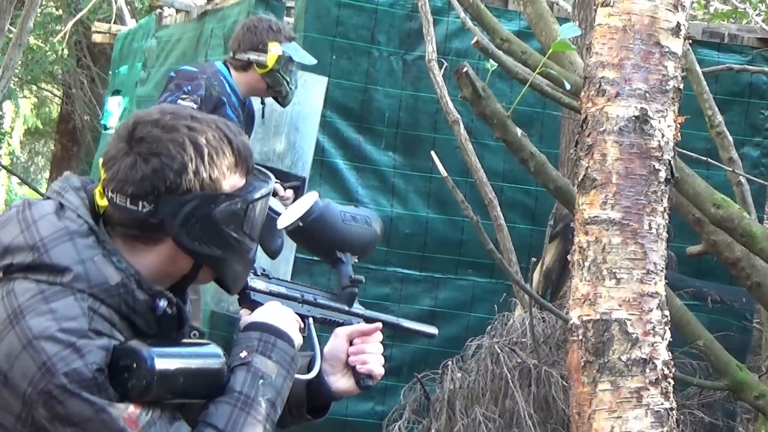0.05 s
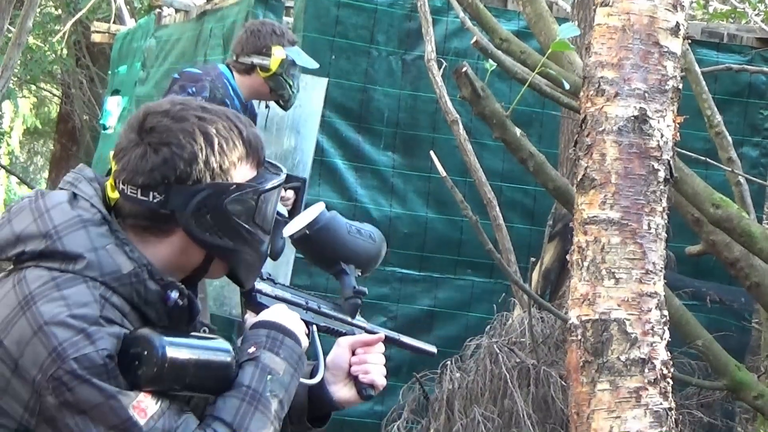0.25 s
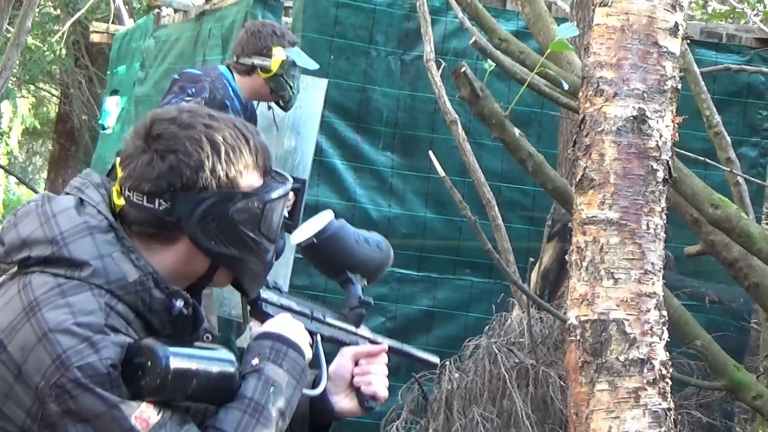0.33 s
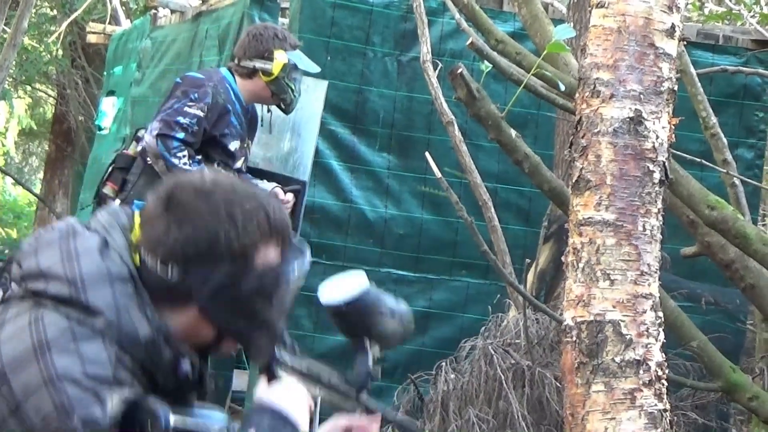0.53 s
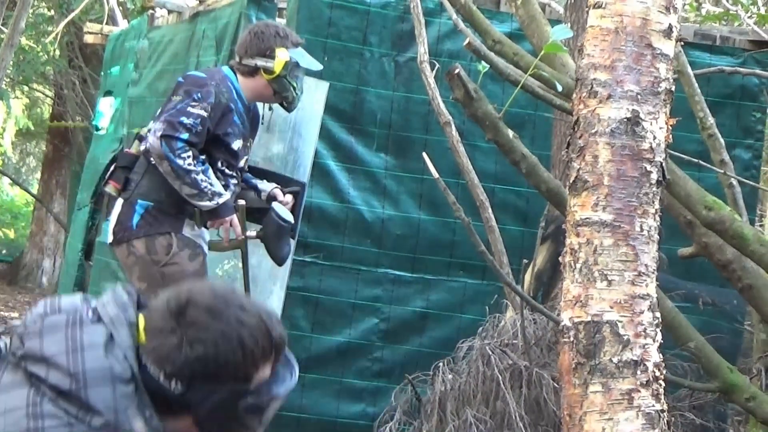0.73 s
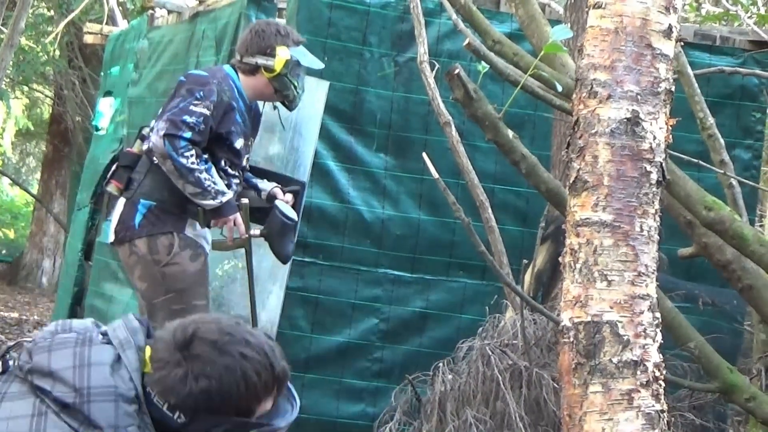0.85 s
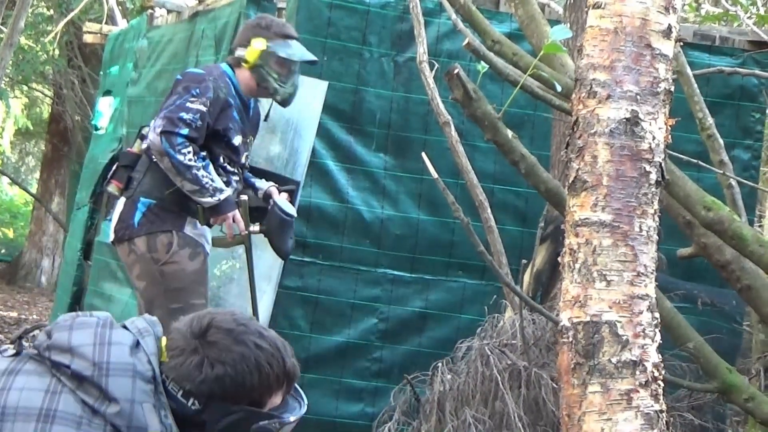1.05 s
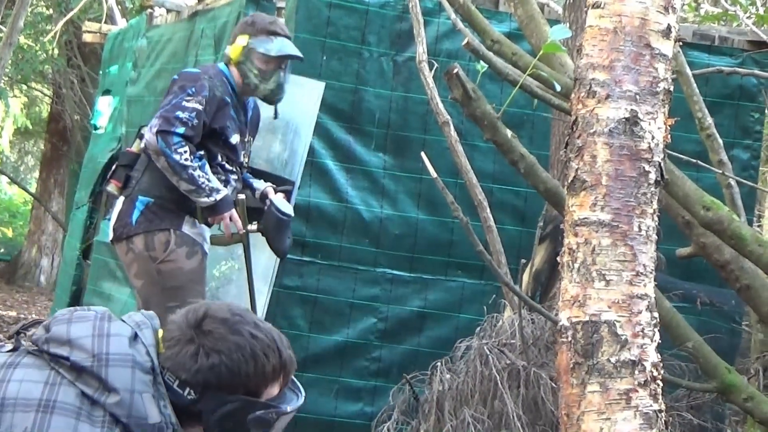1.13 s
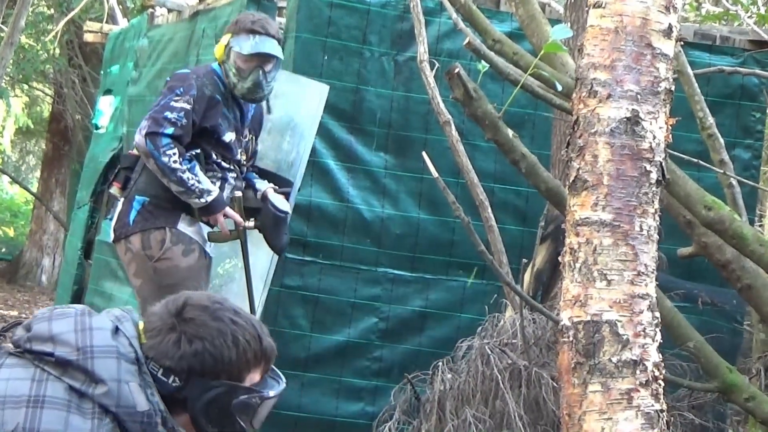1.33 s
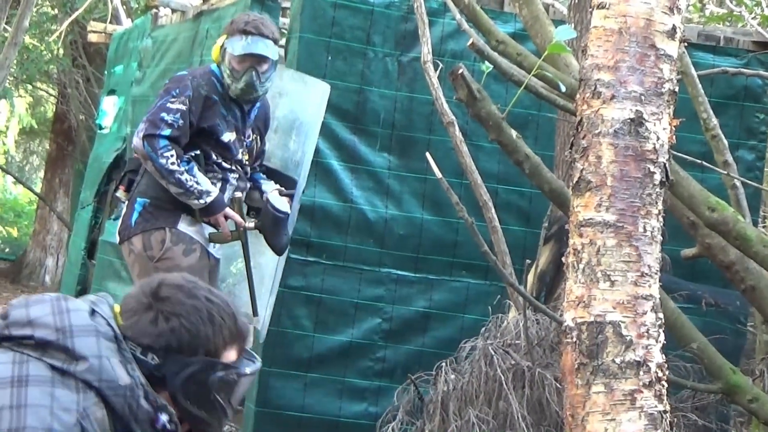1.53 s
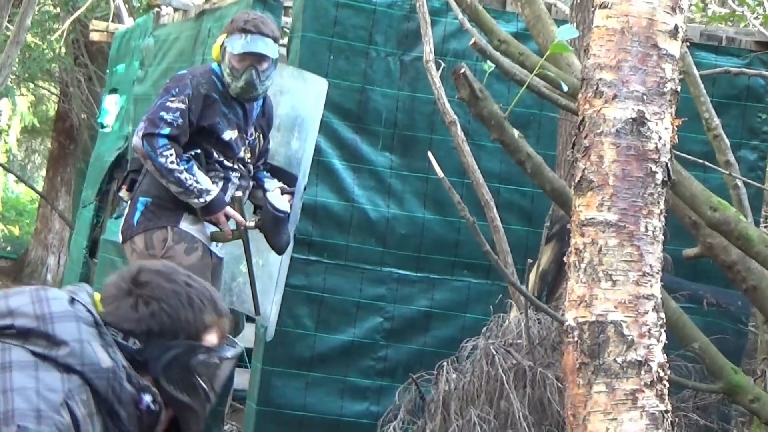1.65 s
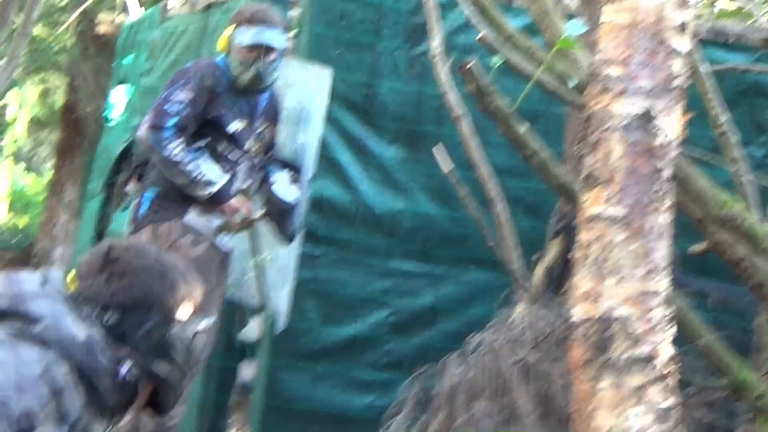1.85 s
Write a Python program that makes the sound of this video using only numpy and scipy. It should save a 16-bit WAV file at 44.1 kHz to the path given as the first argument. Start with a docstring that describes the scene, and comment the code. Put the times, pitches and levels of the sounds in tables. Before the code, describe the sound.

Paintball gunfire: five quick gas pops answered by sharp cracking ball impacts in a quiet wood

```python
"""A soft, distant wash opens a paintball scene in a wood, leaning left: steady coloured noise.
A marker then fires five times: gas pulses pop and ring its barrel modes, spent gas hisses as slow noise.
Clothes rustle as grainy noise; hard bits tick and sizzle close by; far-off pops are dull noise bursts.
Incoming balls crack on the cover, ring its modes, spray the brush and leave a boom.
Knocks are single modes, clicks are short noise, and a diffuse noise tail scatters the fire off trunks."""
import sys
import numpy as np
from scipy import signal
from scipy.fft import rfft, irfft, next_fast_len
from scipy.io import wavfile

SR = 44100
rng = np.random.default_rng(int(sys.argv[2]) if len(sys.argv) > 2 else 0)


def wrap_up_sound(samples):
    """Save the sound to the file named by the first command line argument, as 16-bit audio."""
    columns = np.atleast_2d(samples).T
    # keep every value between -1 and 1, then stretch to whole-number steps
    tamed = np.clip(columns, -1, 1)
    steps = np.round(tamed * 32767).astype(np.int16)
    wavfile.write(sys.argv[1], SR, steps)


N = 83790
TIME = np.arange(N) / SR


def from_db(db):
    """Decibels to gain."""
    return 10 ** (np.asarray(db) / 20)


def rms_one(x):
    """Scale to rms 1."""
    return x / np.sqrt(np.mean(x ** 2) + 1e-20)


def pan(db):
    """Left and right gains for a left-minus-right level difference."""
    return from_db(np.array([[db], [-db]]) / 2)


def level(rows):
    """Gain over time, drawn through (seconds, dB) points."""
    return from_db(np.interp(TIME, *np.transpose(rows)))


def at_hz(points, hz):
    """Read a table on a log-frequency axis."""
    table_hz, value = np.transpose(points)
    return np.interp(np.log(hz + 1), np.log(table_hz), value)


def colour(x, spectrum):
    """Minimum-phase filter with the given spectrum shape; white noise keeps its power."""
    size = 2 * next_fast_len(N)
    hz = np.arange(size // 2 + 1) * SR / size
    gain = rms_one(from_db(at_hz(spectrum, hz)))
    # Folding the cepstrum onto positive time makes the filter causal
    cepstrum = irfft(np.log(gain))
    cepstrum[1:size // 2] *= 2
    cepstrum[size // 2 + 1:] = 0
    response = np.exp(rfft(cepstrum))
    return irfft(rfft(x, size) * response)[..., :N]


def snap(envelope, spectrum):
    """A short rush of turbulence: random signs under an envelope, coloured as it leaves the source."""
    return colour(envelope * rng.choice([-1, 1], N), spectrum)


# How alike left and right are in diffuse noise. Each row: frequency in Hz, likeness from 0 to 1.
STEREO_LIKENESS = [(60, 1), (400, 0.99), (1000, 0.91), (2500, 0.53), (5000, 0.76), (9000, 0.9), (14000, 1)]


def noise(spectrum, envelope=1):
    """Diffuse stereo noise under an envelope, then coloured."""
    alike = np.clip(at_hz(STEREO_LIKENESS, np.arange(N // 2 + 1) * SR / N), 0, 1)
    mid, side = rfft(rng.standard_normal((2, N)))
    both = np.sqrt(1 + alike) * mid + np.sqrt(1 - alike) * side * [[1], [-1]]
    return colour(envelope * rms_one(irfft(both, N)), spectrum)


def burst(s, t60, rise=0):
    """Envelope that starts at s seconds, rises linearly and dies away by 60 dB per t60."""
    age = np.maximum(TIME - s, 0)
    attack = np.minimum(age / max(rise, 1 / SR), 1)
    return attack * from_db(-60 * np.clip((age - rise) / t60, 0, 2))


def ring(s, hz, t60, rise=0):
    """One resonant mode, kicked at s seconds."""
    return burst(s, t60, rise) * np.cos(2 * np.pi * hz * (TIME - s))


def grain(spread_db, size=30):
    """Gain that jumps from one tiny contact to the next, every size samples."""
    sizes = from_db(spread_db * np.minimum(rng.exponential(1, N // size + 1), 6))
    return rms_one(np.repeat(sizes, size)[:N])


# Tone of the distant wash. Each row: frequency in Hz, relative spectrum in dB.
WASH_TONE = [(25, -33), (50, -33), (75, -14.5), (120, -18.5), (250, -18), (400, -10), (650, -4), (980, 2),
             (1500, -5.5), (2500, -14), (5000, -30.5), (9000, -25), (16000, -33.5)]
# Slow swell of the wash. Each row: time in seconds, level in dB before panning.
WASH_SWELL = [(0, -54), (.2, -55), (.9, -49.5), (1.4, -50), (1.9, -51)]
WASH_PAN_DB = 2.1  # left minus right


def wash():
    """Soft, distant wash of the wood: diffuse noise swelling slowly, louder on the left."""
    return pan(WASH_PAN_DB) * noise(WASH_TONE, level(WASH_SWELL))


# Tone of the clothing. Each row: frequency in Hz, relative spectrum in dB.
RUSTLE_TONE = [(80, -29), (500, -10), (2000, 0), (4000, 3), (6500, -0.5), (9000, 1), (12000, -7),
               (16000, -30)]
# Movement of the clothes. Each row: time in seconds, level in dB.
RUSTLE_MOVES = [(0, -66), (.212, -68), (.222, -46.5), (.7, -48.5), (1.0, -50.5), (1.2, -55), (1.4, -62.5),
                (1.55, -59), (1.62, -63), (1.7, -60), (1.78, -66), (1.9, -62)]
RUSTLE_GRAIN_DB = 2


def rustle():
    """Clothes rustle as many tiny rubbing contacts of uneven strength."""
    return noise(RUSTLE_TONE, level(RUSTLE_MOVES) * grain(RUSTLE_GRAIN_DB))


# The marker's shots. Each row: start in seconds, pop trim in dB, gas hiss level in dB.
MARKER_SHOTS = [(0.2382, 0.5, -36.5), (0.3935, 1, -37.5), (0.5397, 0.5, -35.5), (0.7364, 2, -31.5),
                (0.8386, 2, -33.5)]
# Modes of the barrel and body. Each row: frequency in Hz, level in dB relative to the kick, t60 in seconds.
BARREL_MODES = [(231, -46, 0.045), (365.8, -41.5, 0.13), (582, -42.5, 0.082), (678, -46.5, 0.048),
                (944, -35.5, 0.084), (1136, -34.5, 0.054), (1350, -54, 0.066), (1577, -34, 0.051),
                (1652, -34.5, 0.058), (1995, -33.5, 0.058), (2120, -36, 0.041), (2465, -36, .035),
                (2947, -37.5, 0.043), (4260, -45, 0.057)]
# Tone of the muzzle pop. Each row: frequency in Hz, relative spectrum in dB.
POP_TONE = [(100, -17.5), (500, -3.5), (1800, 8), (3200, 1.5), (5500, -8.5), (9000, -4.5), (16000, -26)]
POP_DB, POP_T60_S = -28.5, 0.044  # each shot trims this level
BOLT_LEAD_S, BOLT_DB = 0.00241, -22  # bolt knock ahead of the pulse, relative to it
PULSE_LOW_HZ, PULSE_TOP_HZ = 119, 4700
PUSH_HZ, PUSH_DB, PUSH_RISE_S, PUSH_T60_S = 150, -37, .0065, .018  # low thump of gas leaving the muzzle


def marker():
    """The bolt knocks, then the gas pulse thumps, pops and rings the barrel."""
    pops = sum(from_db(db + POP_DB) * burst(s, POP_T60_S) for s, db, _ in MARKER_SHOTS)
    kicks = np.zeros(N)
    for s, db, _ in MARKER_SHOTS:
        kicks[int(s * SR)] += from_db(db)
        kicks[int((s - BOLT_LEAD_S) * SR)] += from_db(db + BOLT_DB)
    pulse_band = signal.butter(2, [PULSE_LOW_HZ, PULSE_TOP_HZ], "band", fs=SR, output="sos")
    pulses = signal.sosfilt(pulse_band, kicks)
    # Each mode builds up over half a cycle
    barrel = sum(from_db(db) * ring(0, hz, t60, .5 / hz) for hz, db, t60 in BARREL_MODES)
    push = from_db(PUSH_DB) * ring(0, PUSH_HZ, PUSH_T60_S, PUSH_RISE_S)
    return signal.fftconvolve(pulses, barrel + push)[:N] + snap(pops, POP_TONE)


# Tone of the spent gas. Each row: frequency in Hz, relative spectrum in dB.
GAS_TONE = [(50, -33), (150, -13), (400, -5.5), (900, 0.5), (2200, 0), (3500, -2), (6000, -2.5), (9000, -2),
            (12000, -7.5), (16000, -34)]
GAS_RISE_S, GAS_T60_S = 0.022, 0.32


def gas():
    """Spent gas hisses out after each shot as turbulent noise."""
    hiss = sum(from_db(db) * burst(s, GAS_T60_S, GAS_RISE_S) for s, _, db in MARKER_SHOTS)
    return noise(GAS_TONE, hiss)


# Tone of the scatter from the trunks. Each row: frequency in Hz, relative spectrum in dB.
TRUNK_TONE = [(60, -6.5), (300, -3), (900, -4.5), (3000, -2.5), (9000, -6), (16000, -5)]
TRUNK_DB, TRUNK_RISE_S, TRUNK_T60_S = -12.5, 0.023, 0.62


def trunks(x):
    """Diffuse scatter from the trees: the fire convolved with a decaying noise tail."""
    echo = noise(TRUNK_TONE, burst(0, TRUNK_T60_S, TRUNK_RISE_S))
    unit_echo = rms_one(echo) / np.sqrt(N)
    return from_db(TRUNK_DB) * signal.fftconvolve(x, unit_echo, axes=1)[:, :N]


# Hard bits landing close by. Each row: start in seconds, tick level in dB, sizzle level in dB.
TICK_HITS = [(0.2563, -37, -55), (0.3676, -19.5, -30), (.5078, -24, -40), (0.5103, -20, -34),
             (.5237, -13, -42), (0.529, -34, -28.5), (0.712, -34, -60), (.718, -29, -60),
             (0.7229, -25.5, -66), (1.1051, -18, -51), (1.1085, -24, -43), (1.1095, -30, -43.5)]
# Tone of tick and sizzle. Each row: frequency in Hz, relative spectrum in dB.
TICK_TONE = [(100, -56), (500, -24.5), (2000, -36), (4000, -18), (7000, -10.5), (8800, 1.5), (10300, -2.5),
             (12000, -7.5), (16000, -26)]
TICK_T60_S, SIZZLE_T60_S = 0.0066, 0.098


def ticks():
    """Hard bits tick brightly as very short noise, each with a longer diffuse sizzle."""
    contacts = sum(from_db(db) * burst(s, TICK_T60_S) for s, db, _ in TICK_HITS)
    sizzle = sum(from_db(db) * burst(s, SIZZLE_T60_S) for s, _, db in TICK_HITS)
    return snap(contacts, TICK_TONE) + noise(TICK_TONE, sizzle)


# Balls bursting on the cover. Each row: start in seconds, crack level in dB, ring frequency in Hz,
# ring level in dB, spray level in dB, boom level of the cover in dB.
BALL_HITS = [(0.3528, -21, 2600, -22.5, -33, -56), (0.4237, -28.5, 1740, -28, -49, -62),
             (0.5011, -21, 2420, -27.5, -31.5, -53), (0.5673, -17, 1690, -20, -32, -45),
             (0.7637, -18, 1650, -19.5, -28.5, -31), (0.8658, -17.5, 2310, -15.5, -36.5, -63)]
# Tone of the splitting shell. Each row: frequency in Hz, relative spectrum in dB.
CRACK_TONE = [(50, -28), (150, -21), (450, -13), (700, -2.5), (1100, 2), (3000, -0.5), (4100, -5),
              (5400, 1), (7000, -3.5), (9000, -1), (12000, -15.5), (16000, -23)]
# Modes of the cover, rung by every ball. Each row: frequency in Hz, level in dB relative to the crack,
# t60 in seconds.
COVER_MODES = [(882.4, -15, 0.11), (917, -24.5, 0.15), (1137, -17, 0.071), (1382, -18, 0.063),
               (1542, -21, 0.064), (1670, -17, .07), (2230, -19.5, .06), (2340, -18.5, 0.091),
               (2980, -21.5, 0.063), (5040, -27, 0.013)]
CRACK_T60_S, RING_T60_S, RING_LOW_HZ = 0.01, 0.014, 685
FRACTURE_DB, FRACTURE_T60_S = -5.5, 0.0021  # first split of the shell, relative to the crack


def splats():
    """Each shell splits and cracks, ringing the spot that it hits and the whole cover."""
    shell = burst_pair = 0
    kicks = np.zeros(N)
    for s, db, *_ in BALL_HITS:
        burst_pair = burst(s, CRACK_T60_S) + from_db(FRACTURE_DB) * burst(s, FRACTURE_T60_S)
        shell = shell + from_db(db) * burst_pair
        kicks[int(s * SR)] = from_db(db)
    spots = sum(from_db(db) * ring(s, hz, RING_T60_S, 1 / hz) for s, _, hz, db, *_ in BALL_HITS)
    # Neighbouring modes alternate in sign
    cover = sum((-1) ** k * from_db(db) * ring(0, hz, t60, 1 / hz)
                for k, (hz, db, t60) in enumerate(COVER_MODES))
    rings = spots + signal.fftconvolve(kicks, cover)[:N]
    high_pass = signal.butter(2, RING_LOW_HZ, "high", fs=SR, output="sos")
    return snap(shell, CRACK_TONE) + signal.sosfilt(high_pass, rings)


# Tone of the spray. Each row: frequency in Hz, relative spectrum in dB.
SPRAY_TONE = [(50, -45), (150, -41), (500, 0.5), (1000, 0), (2300, 0.5), (4000, 4), (6500, 0.5), (9000, 6),
              (12000, -5.5), (16000, -17)]
SPRAY_RISE_S, SPRAY_T60_S, SPRAY_GRAIN_DB = 0.0025, 0.32, 1.5


def spray():
    """Paint and shell spray the brush in many uneven little contacts."""
    showers = sum(from_db(db) * burst(s, SPRAY_T60_S, SPRAY_RISE_S) for s, *_, db, _ in BALL_HITS)
    return noise(SPRAY_TONE, showers * grain(SPRAY_GRAIN_DB))


# Tone of the booming cover. Each row: frequency in Hz, relative spectrum in dB.
BOOM_TONE = [(60, -41), (160, -9), (350, -23), (650, -2), (1100, -4), (1800, -0.5), (3000, -8), (8000, -28)]
BOOM_RISE_S, BOOM_T60_S = 0.006, 0.57


def boom():
    """The struck cover booms on as a slowly fading diffuse noise."""
    return noise(BOOM_TONE, sum(from_db(db) * burst(s, BOOM_T60_S, BOOM_RISE_S) for s, *_, db in BALL_HITS))


# Dull knocks. Each row: start in seconds, level in dB, frequency in Hz, t60 in seconds.
DULL_KNOCKS = [(.5008, -39, 228, 0.027), (.7995, -31, 698, 0.077), (.9325, -35.5, 589, 0.051),
               (1.458, -49, 253, 0.031)]


def knocks():
    """Each dull knock is one damped mode that builds up over a cycle."""
    return sum(from_db(db) * ring(s, hz, t60, 1 / hz) for s, db, hz, t60 in DULL_KNOCKS)


# Shots elsewhere in the wood. Each row: start in seconds, level in dB.
FAR_SHOTS = [(0.691, -37), (1.65, -50), (1.697, -48), (1.708, -48)]
# Dulled tone of the far shots. Each row: frequency in Hz, relative spectrum in dB.
FAR_TONE = [(150, -26), (600, -14), (1100, 4), (2100, 0), (3200, -12.5), (8000, -24)]
FAR_T60_S = 0.068


def far_pops():
    """Shots elsewhere in the wood, dull and smeared into diffuse noise bursts."""
    return noise(FAR_TONE, sum(from_db(db) * burst(s, FAR_T60_S) for s, db in FAR_SHOTS))


# Twigs and gear clicking. Each row: start in seconds, level in dB.
CLICK_HITS = [(0.7815, -22.5), (0.9583, -38), (1.0485, -38), (1.095, -29), (1.164, -48), (1.332, -46.5),
              (1.348, -46), (1.447, -48.5), (1.542, -45), (1.706, -44)]
# Tone of the clicks. Each row: frequency in Hz, relative spectrum in dB.
CLICK_TONE = [(100, -39), (1000, -10), (2500, -11.5), (4500, -0.5), (7000, -1.5), (9500, 4), (16000, -14)]
CLICK_T60_S = .011


def clicks():
    """Twigs and gear click drily as short noise."""
    return snap(sum(from_db(db) * burst(s, CLICK_T60_S) for s, db in CLICK_HITS), CLICK_TONE)


# Sideways lean of the direct fire. Each row: frequency in Hz, left minus right in dB.
FIRE_LEAN = [(300, -1.2), (700, 0), (1400, -3), (2800, -3.5), (5600, -2.5), (10000, -2.6), (14000, 1)]


def from_right(x):
    """Lean the fire right by a level difference that varies with pitch and is slight in the bass."""
    db = at_hz(FIRE_LEAN, np.arange(N // 2 + 1) * SR / N)
    return irfft(rfft(x) * from_db(np.array([db, -db]) / 2), N)


def scene():
    """The exchange of fire, a little to the right, among the trees."""
    small_hits = ticks() + knocks() + clicks()
    fire = marker() + gas() + splats() + spray() + boom() + small_hits
    return wash() + rustle() + from_right(fire) + trunks(fire) + far_pops()


CUTOFF_HZ = 16000


def record(dry):
    """The top is cut steeply, without phase shift."""
    # The stopband begins 500 Hz above the cutoff
    low_pass = signal.cheby2(16, 40, CUTOFF_HZ + 500, fs=SR, output="sos")
    return signal.sosfiltfilt(low_pass, dry)


dry = scene()
out = record(dry)
wrap_up_sound(out)
```